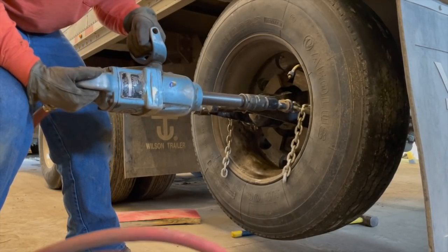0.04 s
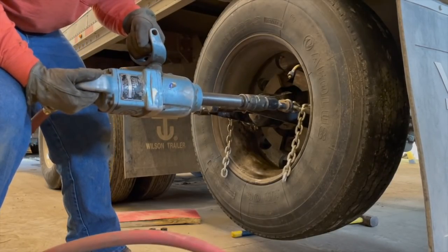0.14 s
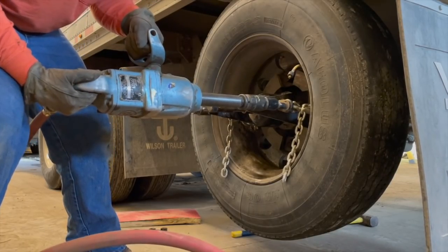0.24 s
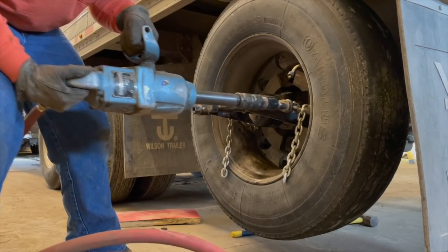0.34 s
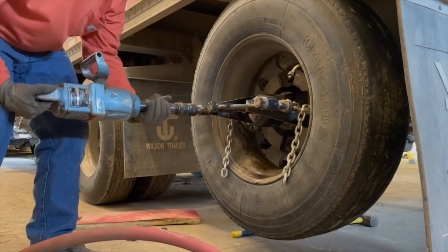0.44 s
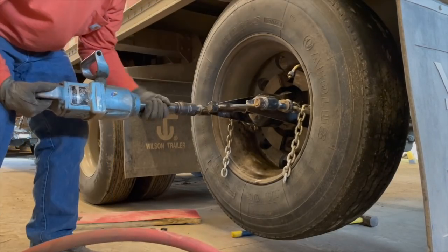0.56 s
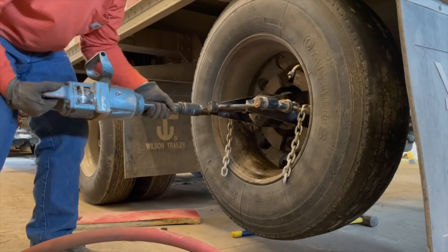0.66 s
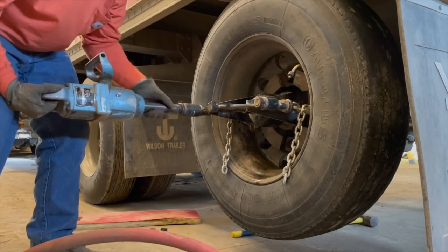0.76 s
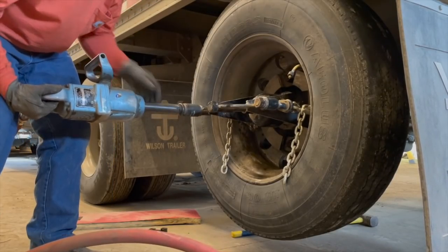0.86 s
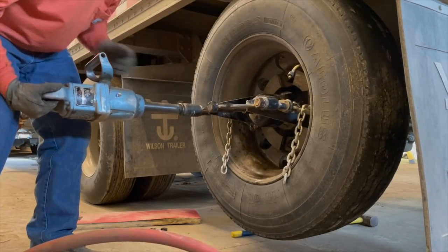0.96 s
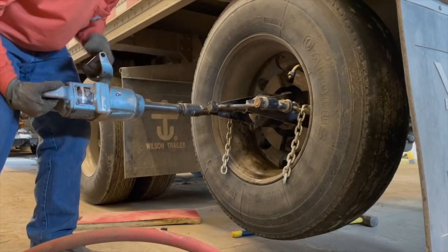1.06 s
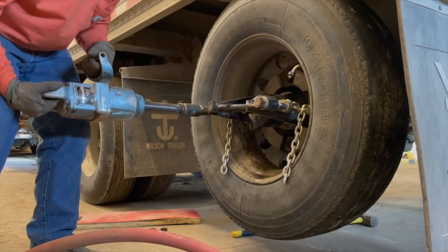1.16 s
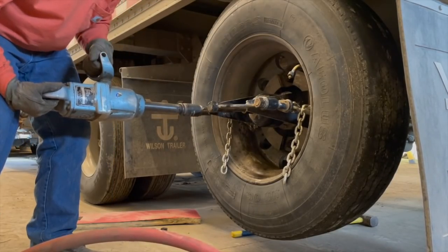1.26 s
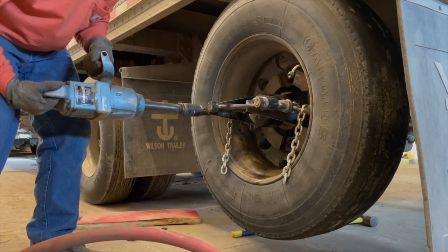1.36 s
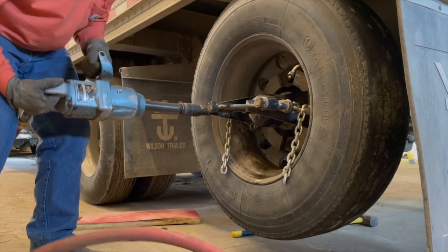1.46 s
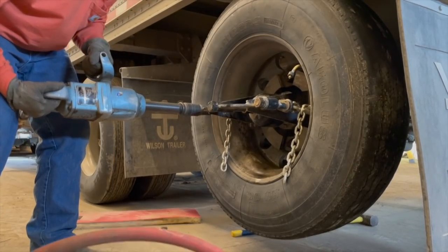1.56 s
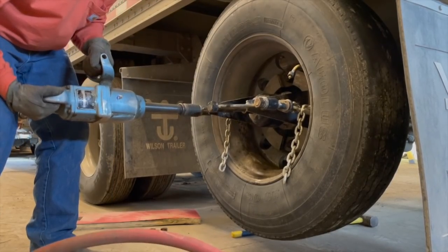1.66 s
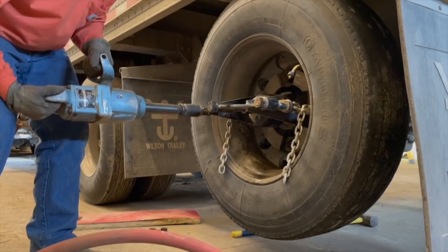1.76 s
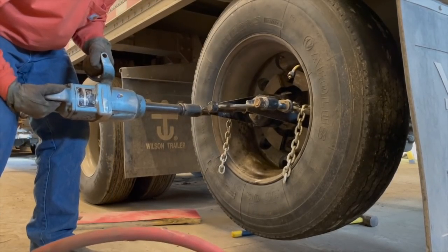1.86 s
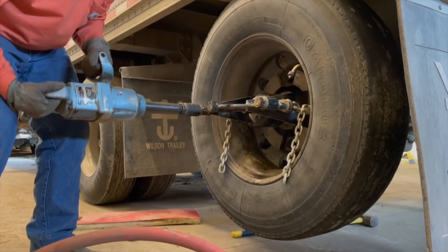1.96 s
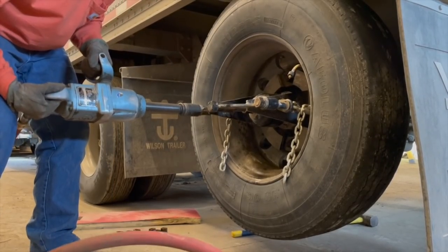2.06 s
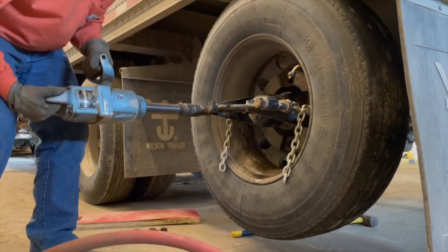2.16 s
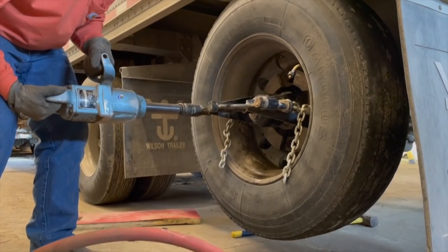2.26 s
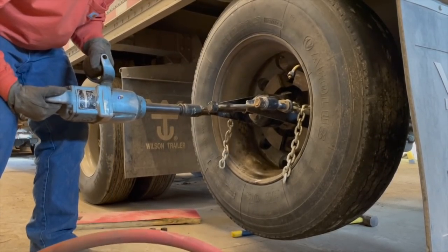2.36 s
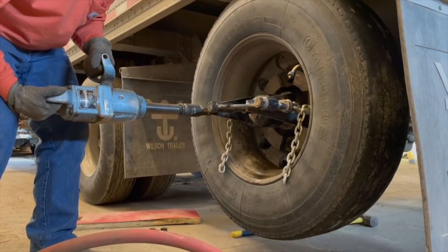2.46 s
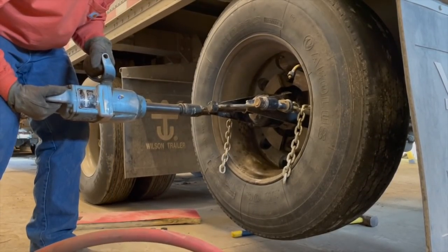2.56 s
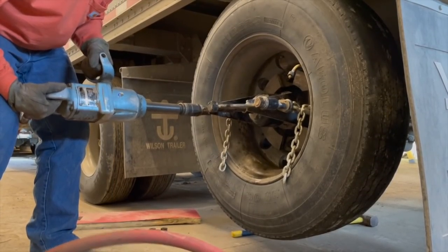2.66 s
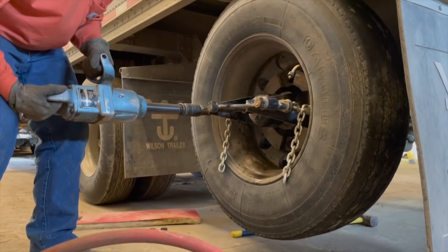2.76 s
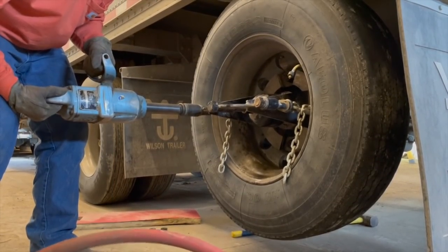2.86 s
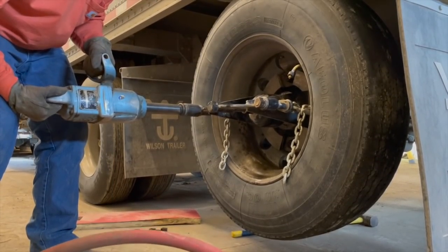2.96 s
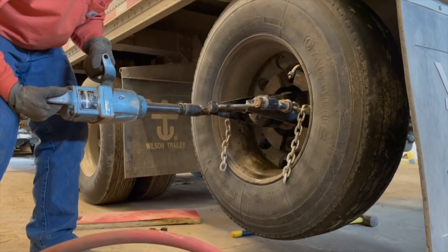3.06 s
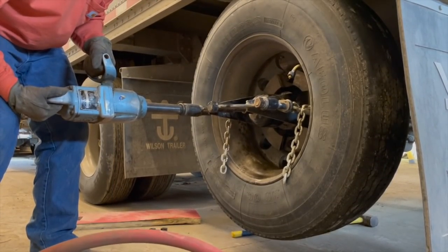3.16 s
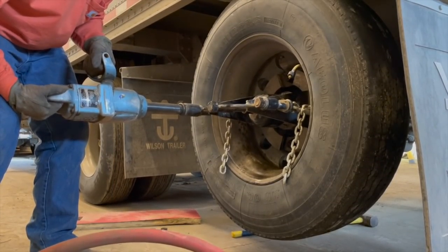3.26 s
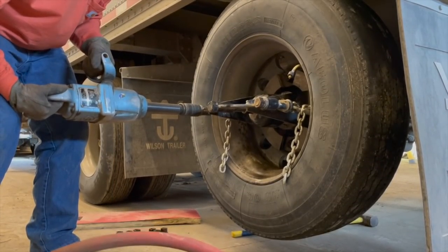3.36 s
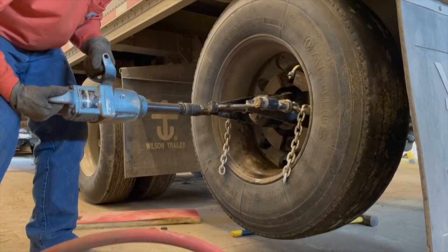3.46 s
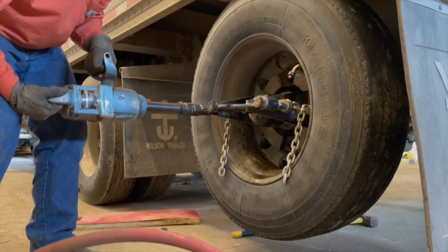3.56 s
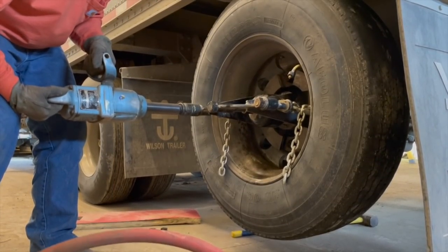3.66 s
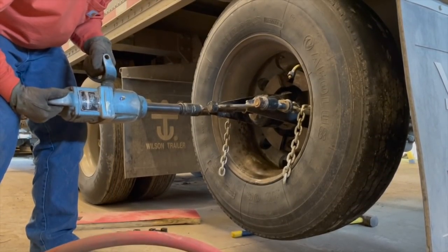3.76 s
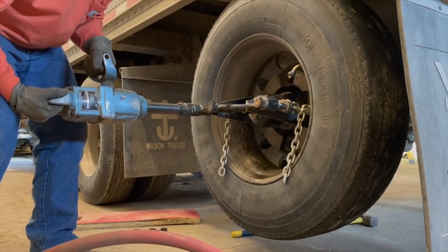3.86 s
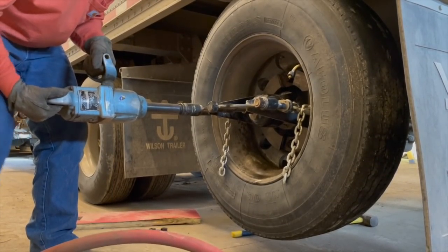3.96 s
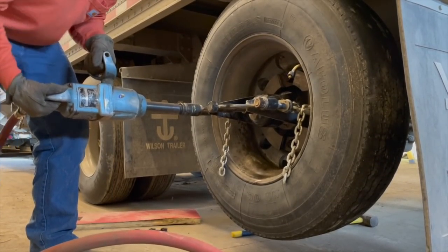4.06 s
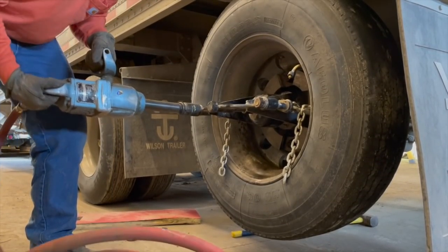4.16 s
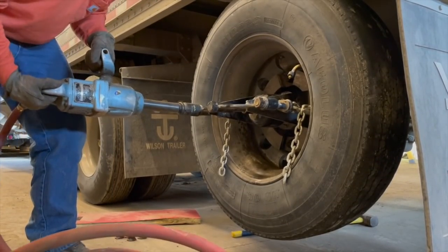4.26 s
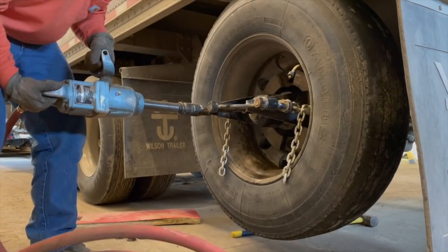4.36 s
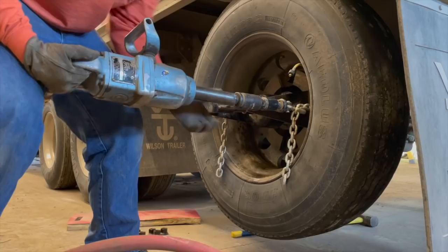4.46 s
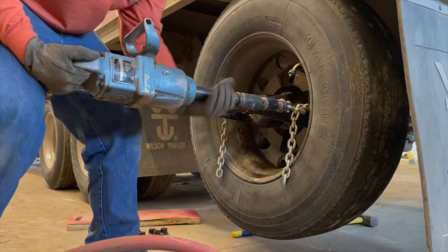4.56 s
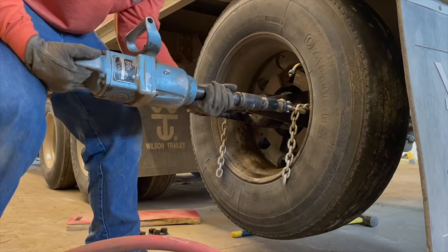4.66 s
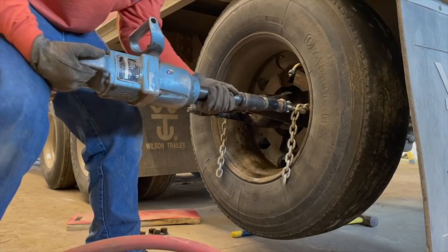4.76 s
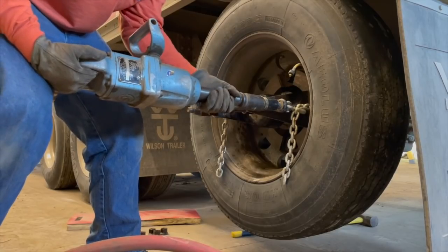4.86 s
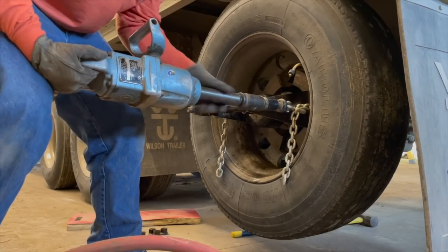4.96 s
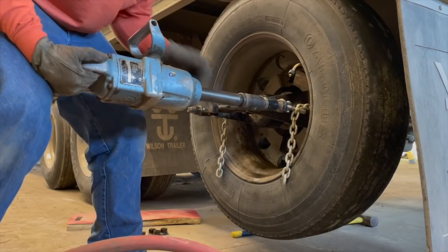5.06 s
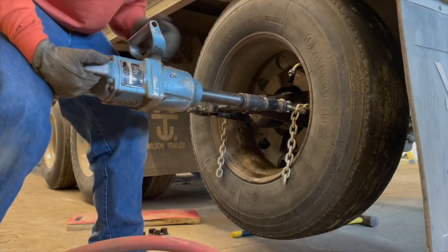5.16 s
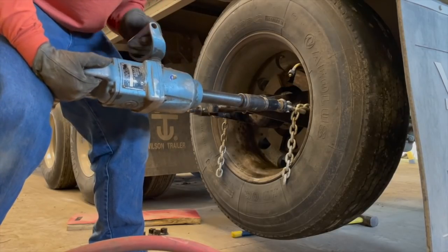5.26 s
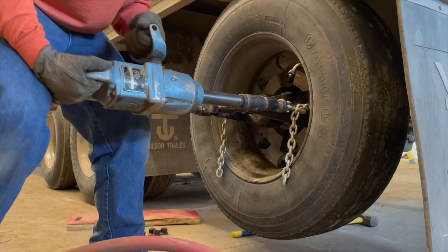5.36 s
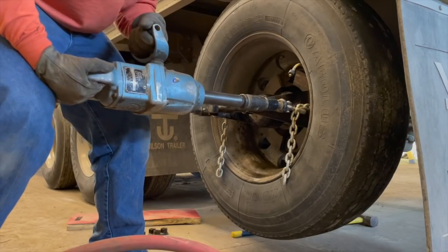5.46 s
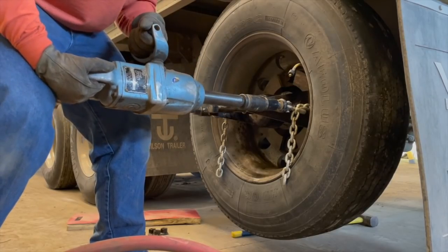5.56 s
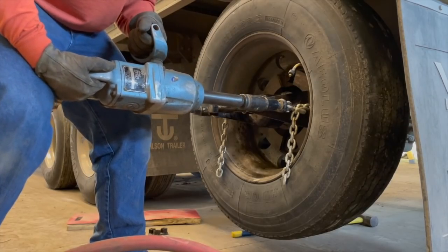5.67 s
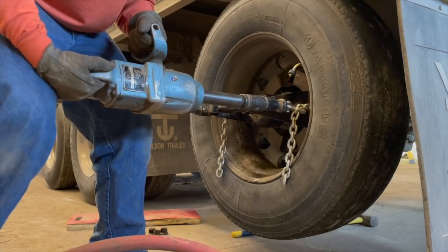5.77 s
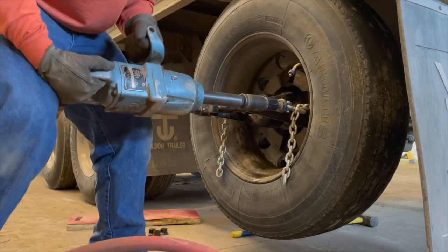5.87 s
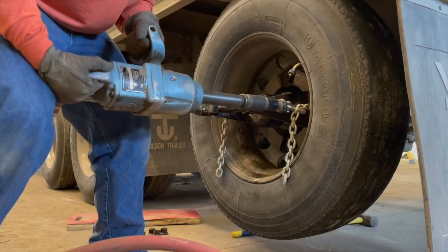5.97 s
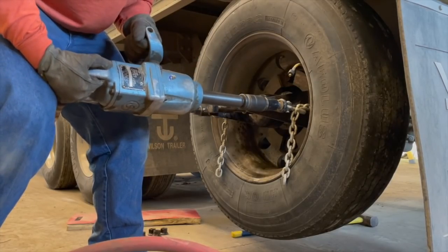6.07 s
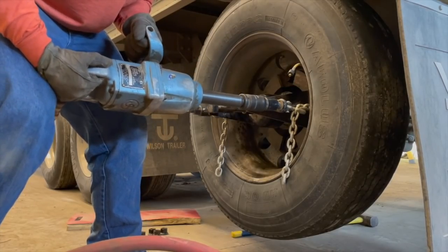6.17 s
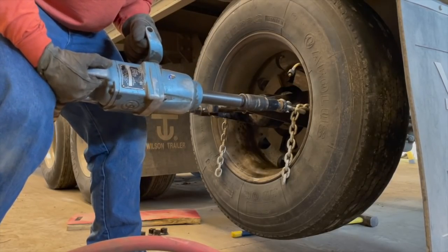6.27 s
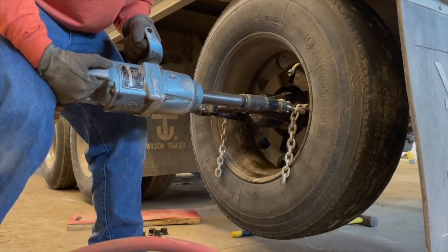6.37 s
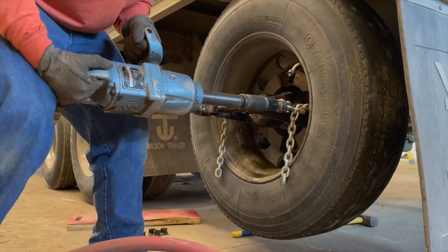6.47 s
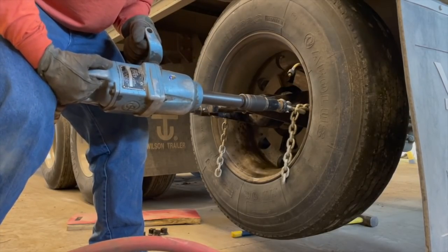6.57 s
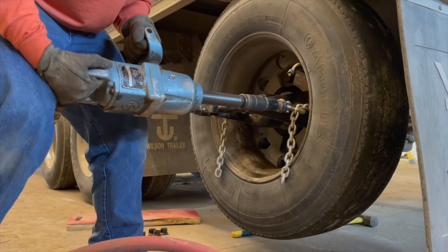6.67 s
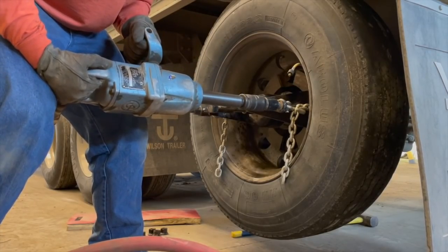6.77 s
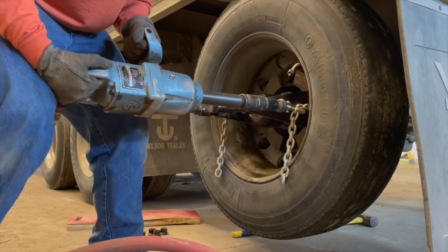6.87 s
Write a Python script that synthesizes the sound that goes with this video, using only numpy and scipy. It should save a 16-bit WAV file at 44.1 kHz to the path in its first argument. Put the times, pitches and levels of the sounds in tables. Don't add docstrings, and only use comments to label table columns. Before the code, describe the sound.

Close stereo pickup in a large reverberant shed with faint electrical hum. The echo of an earlier wrench burst cuts away, then a socket softly bumps metal. Four short free spins of an air impact wrench follow, each a roar of exhaust with rotor whine or growl and loose steel rattling. After a quiet gap with faint knocks, rapid steady hammering on a wheel nut rings loudly, then eases.

```python
import sys
import numpy as np
from scipy import signal
from scipy.fft import rfft, irfft, next_fast_len
from scipy.io import wavfile
from scipy.ndimage import uniform_filter1d

SR = 44100
rng = np.random.default_rng(int(sys.argv[2]) if len(sys.argv) > 2 else 0)


def wav_out(sig):
    wavfile.write(sys.argv[1], SR, np.round(np.clip(np.atleast_2d(sig).T, -1, 1) * 32767).astype(np.int16))


def voltage_ratio(decibels):
    exponent = np.asarray(decibels, float) / 20
    return 10 ** exponent


N = 305172
T = np.arange(N) / SR

# opens_s, shuts_s, exhaust_db, rise_s, fall_s
TRIGGER_PULLS = [
    (1.397, 1.539, -18, 0.0059, 0.049),
    (1.949, 2.108, -18, 0.014, 0.1),
    (2.6, 2.766, -19, .008, 0.022),
    (3.27, 3.436, -19, 0.053, 0.091),
    (5.824, 6.388, -20, 0.058, .2),
    (6.3, 7.2, -23.5, .03, .1),
]
# start_s, air_cut_s, free_pitch_hz, run_up_s, tone_db
FREE_SPINS = [
    (1.397, 1.563, 339.4, .11, -27.5),
    (1.95, 2.115, 155.8, .04, -30.5),
    (2.597, 2.77, 175.8, .065, -32.5),
    (3.275, 3.439, 298.8, .14, -28),
]
# multiple, level_db
VANE_HARMONICS = [(1, -3), (2, -7.5), (3, -9.5), (4, -12), (5, -14.5), (6, -11.5)]
# start_s, level_db, length_s, swell_db
VALVE_LEAKS = [
    (1.367, -59.5, 0.01, 26.5),
    (1.381, -23.5, 0.017, -2),
    (1.933, -23.5, .016, 4.5),
    (2.577, -36.5, 0.022, 9.5),
    (3.252, -31.5, 0.0214, 8),
    (5.792, -36, 0.038, 12),
]
# time_s, level_db
HOSE_HISS_FADE = [(.467, -70), (.6, -72), (.75, -85.5), (.85, -96)]
# centre_s, level_db, half_width_s
AIR_SURGE = (1.775, -30.5, .1)
# pitch_hz, level_db
JET_SPECTRUM = [(40, -22.5), (90, -4.5), (200, -5), (500, -2), (1500, -1.5), (3200, 0), (5000, -4),
                (8000, -2.5), (12000, -4.5), (14500, -10.5), (15600, -17), (15900, -54.5)]
# pitch_hz, width_hz, lift_db
WHEEL_MODES = [(220, 20, 4.5), (472, 20, 6), (700, 42, 2.5), (963, 29, 1.5), (1500, 200, 2.5),
               (2040, 200, 1.5), (3070, 260, 0), (3380, 130, 1), (5080, 300, 3.5), (6185, 260, 2.5)]
# pitch_hz, width_hz, lift_db
ANVIL_MODES = [(332, 44, 10.5), (700, 70, 14.5), (1110, 78, 1.5), (1500, 180, 6.5), (1900, 120, 1.5),
               (2150, 130, 1.5), (3090, 250, 6.5), (4100, 200, 7), (4800, 250, 6), (6600, 220, 7.5)]
# first_blow_s, period_s, peak_db
HAMMER_BEATS = [
    (5.845, .0326, -7.5),
    (6.435, .0356, -10),
]
BEAT_COUNTS = [18, 14]
# start_s, peak_db, clang_hz
SINGLE_BLOWS = [(1.399, -3, 3540), (1.412, -7, 1450), (1.427, -7.5, 4290), (1.452, -12, 2830),
                (1.969, -2.5, 3490), (1.974, -14, 1480), (2.003, -11.5, 3530), (2.041, -15.5, 2950),
                (2.055, -12.5, 1470), (2.112, -10, 1960), (2.159, -12.5, 1500), (2.207, -10.5, 1970),
                (2.215, -21.5, 1970), (2.292, -16.5, 1940), (2.603, -9, 1470), (2.634, -10.5, 3550),
                (2.696, -5.5, 2890), (2.736, -11, 1670), (2.761, -14.5, 1320), (2.836, -16.5, 1980),
                (2.899, -19.5, 2020), (3.029, -29, 1220), (3.179, -43, 1230), (3.329, -6.5, 1510),
                (3.43, -10, 953), (3.393, -14.5, 3540), (5.911, -6.5, 2160), (6.336, -11.5, 1600),
                (6.366, -9, 1320)]
# start_s, level_db, pitch_hz, t60_s
VALVE_PING = (1.384, -21, 5350, .05)
# start_s, peak_db, body_hz, scrape_db, thud_db
SOCKET_BUMPS = [(.669, -29, 700, -11, -5), (.700, -44, 700, -14, 8), (.737, -46, 700, -22, 3),
                (.79, -59, 700, -17, 14), (.905, -59, 716, -9, -3.5), (4.459, -72, 1000, 4, -9),
                (4.652, -64, 2900, 2.5, -8), (4.711, -57, 857, 7.5, -4), (4.741, -55.5, 2570, 10, 4),
                (4.770, -50, 646, 5, 4), (4.824, -56, 1900, 0, -7), (5.396, -46.5, 1240, 2, -7),
                (5.403, -42, 578, -1, 1), (5.44, -55, 475, -0.5, 0.5)]
# pitch_hz, level_db, t60_s
SOCKET_MODES = [(4635, -51, .1), (6800, -51, 0.16), (9780, -51.5, 0.26)]
# pitch_hz, t60_s
SHED_DECAY = [(60, 0.46), (150, .7), (250, 1.46), (1000, 1.28), (2500, 1.224), (5000, 0.91), (8000, 0.53),
              (13000, 0.39), (16000, 0.17)]
# pitch_hz, level_db
LAMP_HUM = [(60, -68.5), (179.6, -68), (359.4, -55.5), (419.3, -65), (479.2, -71), (539, -76), (659, -77.5),
            (985, -74), (1320, -82.5), (1437, -80)]
# time_s, level_db
HUM_SWING = [(0, 3.5), (.8, -0.5), (1.3, 6), (3.8, -1.5), (6.92, 0)]
# pitch_hz, level_db
ROOM_AIR = [(60, -8), (160, 5), (250, -11), (500, -2), (1000, -8), (1600, -13), (2500, -19.5),
            (4000, -26.5), (6300, -31.5), (10000, -35.5), (14000, -41), (16000, -52.5)]
# peak_s, level_db
FRAME_SHUDDERS = [(0.01, -42.5), (.75, -48), (1.68, -40.5), (2.2, -35), (2.97, -39), (3.55, -39.5),
                  (4.35, -59.5), (4.86, -51.5), (5.49, -50), (6.0, -36.5), (6.2, -32.5), (6.75, -39)]
# pitch_hz, left_lead_rad
PORT_TWIST = [(0, 0), (400, .3), (1900, .25), (3200, 1.45), (4500, .6), (5300, -.4), (5900, -1.9),
              (6900, -1.45), (7500, -2.6), (7900, -np.pi), (10000, -np.pi), (10700, -4.9), (11500, -5.8),
              (12400, -2 * np.pi)]
# pitch_hz, likeness_0_to_1
NEAR_LIKENESS = [(60, .99), (200, .85), (700, .62), (3000, .68), (5300, .4), (7300, .62), (7800, .82),
                 (8150, .88), (8400, .99), (9450, .99), (9700, .87), (10200, .8), (10700, .5), (11500, .7),
                 (12700, .97)]
# pitch_hz, likeness_0_to_1
FAR_LIKENESS = [(60, .98), (200, .75), (600, .1), (7000, .3), (7800, .82), (8300, .99), (9500, .99),
                (10200, .8), (10700, .4), (11500, .7), (12700, .97)]
# pitch_hz, left_minus_right_db
PORT_LEAN = [(60, 2.4), (150, 2.2), (700, 3.6), (1500, 2.6), (3000, 3.8), (4500, 4.6), (7000, 2.6),
             (7800, 0)]

START_HZ = 58.07
COAST_S = 0.385
LOADED_S = 5.0


def evened(x):
    return x / np.sqrt(np.mean(x ** 2) + 1e-20)


def read(points, hz):
    f, value = np.transpose(points)
    return np.interp(np.log(hz + 1), np.log(f + 1), value)


def add(mix, s, sound):
    part = mix[round(s * SR):][:len(sound)]
    part += sound[:len(part)]


def shaped(x, response):
    length = x.shape[-1]
    size = next_fast_len(length)
    return irfft(rfft(x, size) * response(np.fft.rfftfreq(size, 1 / SR)), size)[..., :length]


def ring(t, hz, db, t60):
    return voltage_ratio(db - 60 * t / t60) * np.sin(2 * np.pi * hz * t)


def colour(hz, modes=WHEEL_MODES):
    lift_db = sum(db / (1 + (2 * (hz - f) / width) ** 2) for f, width, db in modes)
    return voltage_ratio(read(JET_SPECTRUM, hz) + lift_db)


def churned(x, patchy_db):
    z = signal.stft(x, nperseg=512)[2]
    patches = rng.standard_normal(z.shape[1:])
    for axis in (0, 1):
        patches = uniform_filter1d(patches, size=4, axis=axis)
    z = z * voltage_ratio(patchy_db * evened(patches))
    return evened(signal.istft(z, nperseg=512)[1][:, :N])


def wrench():
    hz, tone_db = rotor()
    level_db, treble_db = exhaust()
    jitter = uniform_filter1d(rng.standard_normal(N), size=300)
    turns = np.cumsum(hz * (1 + 0.15 * jitter)) / SR
    gusts = evened(uniform_filter1d(rng.standard_normal(N), size=150))

    puff_depth = 0.067 + 0.32 * (START_HZ / hz) * (tone_db > -60)
    puffs = 1.5 + puff_depth * np.cos(2 * np.pi * turns)
    air = rng.standard_normal((2, N)) * puffs * voltage_ratio(1.7 * gusts)
    air = churned(shaped(air, colour), patchy_db=1.82)
    high = shaped(air, lambda f: 1 / (1 + (6500 / (f + 1)) ** 4))
    air = air + (voltage_ratio(treble_db + 4.0) - 1) * high
    low = shaped(air, lambda f: 1 / (1 + (f / 600) ** 4))
    air = air + (voltage_ratio(-2 * (T < LOADED_S)) - 1) * low

    coasting_db = 0.25 * np.minimum(level_db + 21.5, 0)
    hose_db = np.interp(T, *np.transpose(HOSE_HISS_FADE), -200, -200)
    level = voltage_ratio(level_db + coasting_db + 3.0) + voltage_ratio(hose_db)
    for s, db, length, swell_db in VALVE_LEAKS:
        add(level, s, voltage_ratio(db + swell_db * np.linspace(0, 1, int(length * SR))))

    tone = sum(voltage_ratio(db) * np.cos(2 * np.pi * k * turns) for k, db in VANE_HARMONICS)
    tone_level = uniform_filter1d(voltage_ratio(tone_db + 2.5), size=400)
    return uniform_filter1d(level, size=100) * air + tone_level * tone


def exhaust():
    open_treble_db = -5
    level_db, treble_db = np.full(N, -200.0), np.full(N, -10.0)
    for opens, shuts, db, rise, fall in TRIGGER_PULLS:
        on = (T >= opens) & (T < shuts + COAST_S)
        since, after = T[on] - opens, np.maximum(T[on] - shuts, 0)
        kick = 1.5 * np.exp(-since / 0.06)
        opening = -6 * np.maximum(1 - since / rise, 0)
        closing = -22.5 * np.minimum(after / fall, 1) - 16 * after
        level_db[on] = np.maximum(level_db[on], db + kick + opening + closing)
        at_rest = treble_db[on][0] < open_treble_db - 1
        spit = 5 * np.exp(-since / 0.022) * at_rest
        dulling = 151.5 * np.maximum(after - fall / 2, 0)
        treble_db[on] = open_treble_db + spit - dulling
    s, db, half_width = AIR_SURGE
    return np.maximum(level_db, db - 10 * ((T - s) / half_width) ** 2), treble_db


def rotor():
    housing_hz, housing_oct, housing_db = 157, 0.54, 5.5
    hz, tone_db = np.full(N, 150.0), np.full(N, -200.0)
    for start, cut, free_hz, run_up, db in FREE_SPINS:
        on = (T >= start) & (T < cut + COAST_S)
        driven, after = np.minimum(T[on], cut) - start, np.maximum(T[on] - cut, 0)
        driven_hz = free_hz - (free_hz - START_HZ) * np.exp(-driven / run_up)
        hz[on] = driven_hz * np.exp(-after / 0.28)
        fade_db = 122.5 * after + 3 * np.minimum(after / 0.034, 1)
        tone_db[on] = db - 6.0 * np.exp(-driven / 0.018) - fade_db
    housing = np.exp(-(np.log2(hz / housing_hz) / housing_oct) ** 2)
    return hz, tone_db + housing_db * (housing - 0.5)


def hammer():
    out, t, hits = np.zeros((N, 2)), np.arange(3500) / SR, blows()
    noise = rng.standard_normal((len(hits), 2, 2, len(t)))
    cracks = evened(shaped(noise[:, 0], colour))
    rings = evened(shaped(noise[:, 1], lambda f: colour(f, ANVIL_MODES) / (1 + (f / 6000) ** 2)))
    jolt = ring(t, hz=140, db=-11, t60=0.13)
    for (s, db, hz), crack, steel in zip(hits, cracks, rings):
        softness_db = 0.4 * min(db + 11, 0)
        blow = voltage_ratio(softness_db - 60 * t / 0.025) * crack
        blow = blow + voltage_ratio(-1.0 - 60 * t / 0.13) * steel
        blow = blow + ring(t, hz, db=-1.0, t60=0.045) + jolt * (s > LOADED_S)
        add(out, s, (voltage_ratio(db - 11.0) * np.minimum(t / 0.001, 1) * blow).T)
    s, db, hz, t60 = VALVE_PING
    add(out, s, ring(t, hz, db, t60)[:, None])
    return out.T


def blows():
    beats = [[first + period * np.arange(n), np.full(n, db)]
             for (first, period, db), n in zip(HAMMER_BEATS, BEAT_COUNTS)]
    s, db = np.concatenate(beats, axis=1)
    late, force, pitch = rng.standard_normal((len(s), 3)).T
    clang_hz = 1330 * 2 ** (0.45 * abs(pitch))
    return list(SINGLE_BLOWS) + list(zip(s + 0.002 * late, db - 0.4 * force, clang_hz))


def thumps():
    out, t = np.zeros(N), np.arange(8000) / SR
    for s, _, db, *_ in TRIGGER_PULLS[:3]:
        boom = ring(t, hz=105.6, db=db - 3.5, t60=0.17)
        add(out, s + 0.015, np.minimum(t / 0.01, 1) * boom)
    return out


def knocks():
    def scrape_colour(f):
        return colour(f) / (1 + f / 1200) / (1 + (f / 9000) ** 2) / (1 + 100 / (f + 1))

    out, t = np.zeros((N, 2)), np.arange(9000) / SR
    scrapes = evened(shaped(rng.standard_normal((len(SOCKET_BUMPS), 2, len(t))), scrape_colour))
    for (s, db, hz, scrape_db, thud_db), scrape in zip(SOCKET_BUMPS, scrapes):
        thud = voltage_ratio(thud_db) * np.sin(2 * np.pi * 222 * t)
        body = np.sin(2 * np.pi * hz * t) + voltage_ratio(scrape_db) * scrape + thud
        fade = voltage_ratio(db - 60 * np.maximum(t - 0.008, 0) / 0.052)
        rattle = voltage_ratio(db + scrape_db - 9.0 - 60 * t / 0.3) * scrape
        add(out, s, (np.minimum(t / 0.0055, 1) * (fade * body + rattle)).T)
    for hz, db, t60 in SOCKET_MODES:
        add(out, 0.700, ring(t, hz, db, t60)[:, None])
    return out.T


def tails(seconds, t60):
    hz, t, z = signal.stft(rng.standard_normal((2, int(seconds * SR))), SR, nperseg=256)
    tail = signal.istft(z * voltage_ratio(-60 * t / t60(hz)[:, None]), SR, nperseg=256)[1]
    return tail / np.linalg.norm(tail[0])


def shed(x):
    scene_change_s, earlier_db, shed_db = 0.467, -12.5, -10
    tail = tails(1.8, lambda f: np.maximum(read(SHED_DECAY, f), 0.1))
    lead = SR // 2
    pull = evened(shaped(rng.standard_normal(lead), colour))
    pull = pull * (np.arange(lead) < lead - 0.12 * SR)
    earlier = signal.fftconvolve(pull[None], tail, axes=1)[:, lead:lead + int(scene_change_s * SR)]
    out = signal.fftconvolve(np.roll(x, 500)[None], tail, axes=1)[:, :N]
    out[:, :earlier.shape[1]] += voltage_ratio(earlier_db) * earlier
    return voltage_ratio(shed_db) * out


def sway():
    slow = [db - np.maximum(89.5 * (s - T), 38.5 * (T - s)) for s, db in FRAME_SHUDDERS]
    recoil = [db - 21.5 - 10 * ((T - s - 0.02) / 0.035) ** 2 for s, _, db, *_ in TRIGGER_PULLS[:-1]]
    return voltage_ratio(np.maximum(np.max(slow + recoil, axis=0), -69))


def background():
    hum = np.zeros(N)
    wavers = evened(uniform_filter1d(rng.standard_normal((len(LAMP_HUM), N)), size=5000))
    for (hz, db), waver in zip(LAMP_HUM, wavers):
        cycles = hz * T + 0.051 * np.roll(waver, N // 2) + rng.random()
        hum += voltage_ratio(db + 1.0 + 1.3 * waver) * np.sin(2 * np.pi * cycles)
    hum_level = voltage_ratio(np.interp(T, *np.transpose(HUM_SWING)))
    air = evened(shaped(rng.standard_normal((2, N)), lambda f: voltage_ratio(read(ROOM_AIR, f))))
    air_level = voltage_ratio(-60.5 + 14 * np.exp(-T / 0.6))
    rumble = shaped(rng.standard_normal((2, N)), lambda f: f ** 2 / (1 + (2 * (f - 62) / 50) ** 6))
    return hum * hum_level + air * air_level + evened(rumble) * sway()


def ports(pair, likeness):
    def same(f):
        return np.clip(read(likeness, f), 0, 1)

    def turn(f):
        return np.exp(-1j * read(PORT_TWIST, f)) * voltage_ratio(-read(PORT_LEAN, f))

    shared = shaped(pair[0], lambda f: same(f) * turn(f))
    own = shaped(pair[1], lambda f: np.sqrt(1 - same(f) ** 2) * turn(f))
    return np.array([pair[0], shared + own])


def scene():
    tool, bumps = wrench() + hammer() + thumps(), knocks()
    far = shed(tool[0] + voltage_ratio(-4) * bumps[0]) + background()
    return ports(tool + bumps, NEAR_LIKENESS) + ports(far, FAR_LIKENESS)


def band_limit(x):
    return signal.sosfilt(signal.butter(12, 16670, fs=SR, output="sos"), x)


def record(dry):
    limit, low_cut_hz = 1.197, 28
    limited = limit * np.tanh(dry / limit)
    cut = shaped(limited, lambda f: 1 / np.sqrt(1 + (low_cut_hz / (f + 1)) ** 4))
    edge = signal.firwin(255, 15950, window=("kaiser", 9), fs=SR)[None]
    return band_limit(signal.oaconvolve(cut, edge, "same"))


dry = scene()
out = record(dry)
wav_out(out)
```